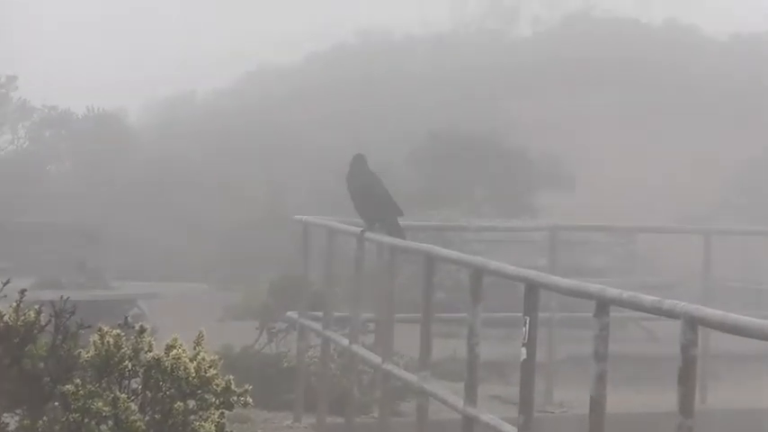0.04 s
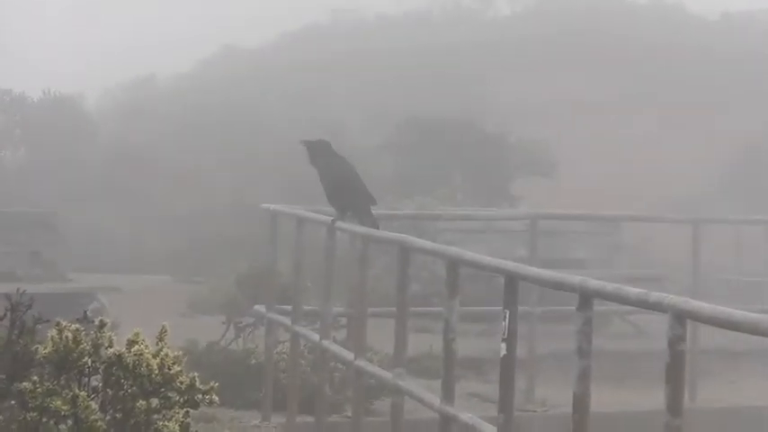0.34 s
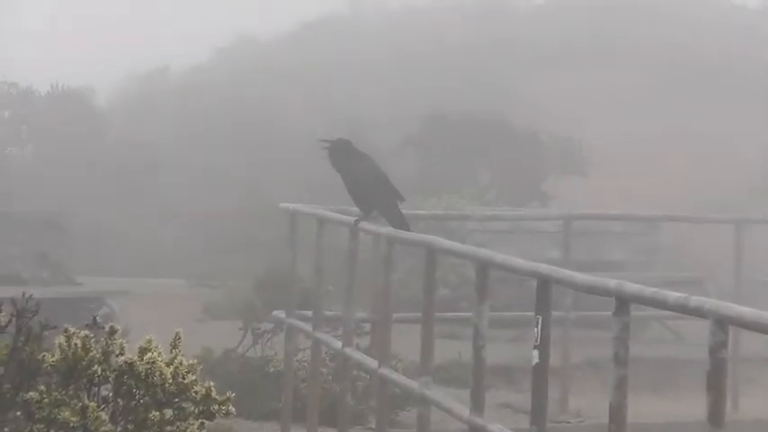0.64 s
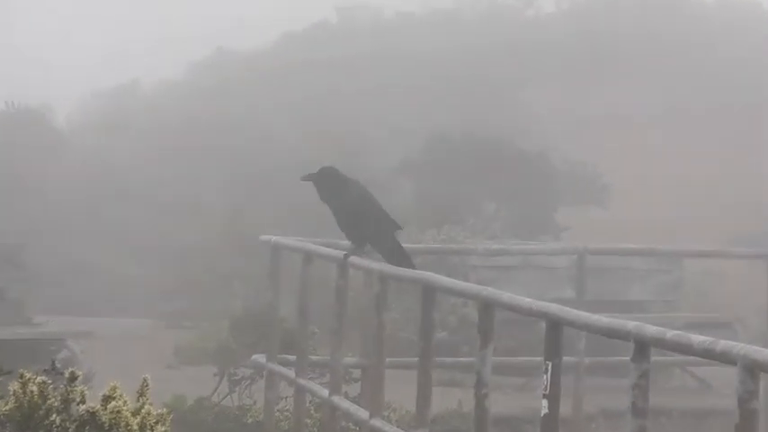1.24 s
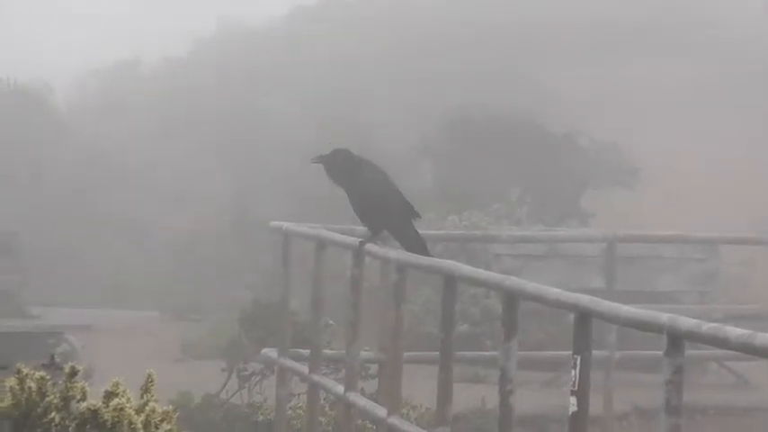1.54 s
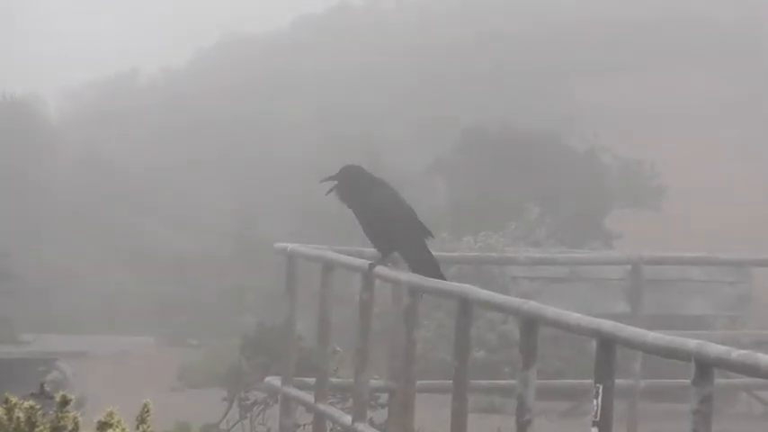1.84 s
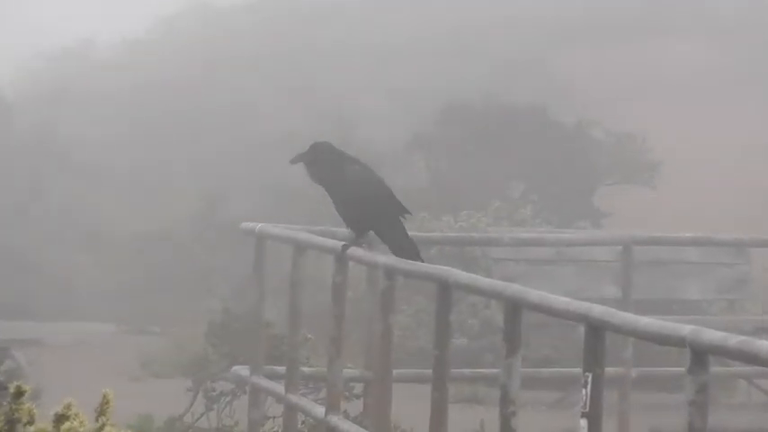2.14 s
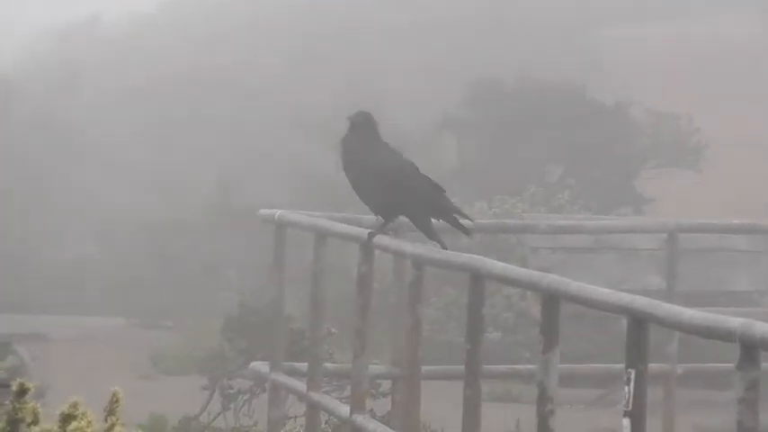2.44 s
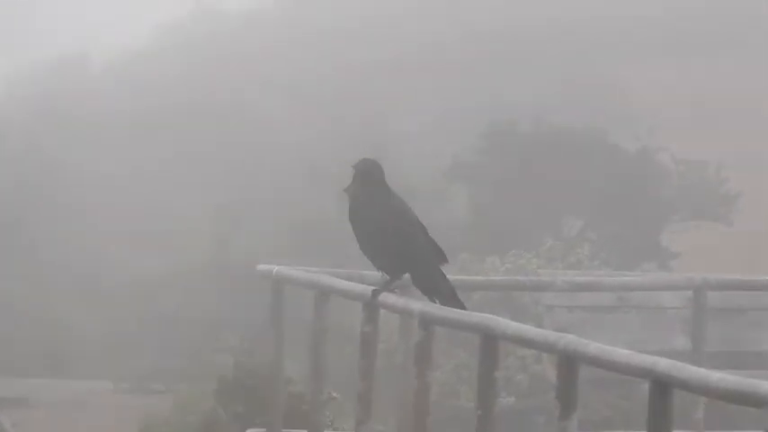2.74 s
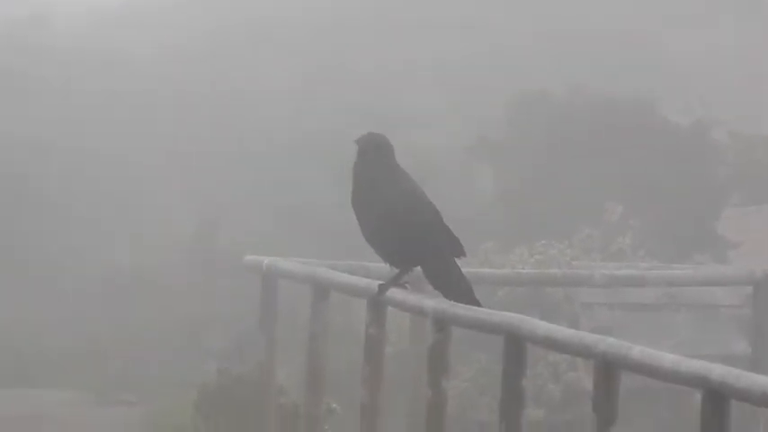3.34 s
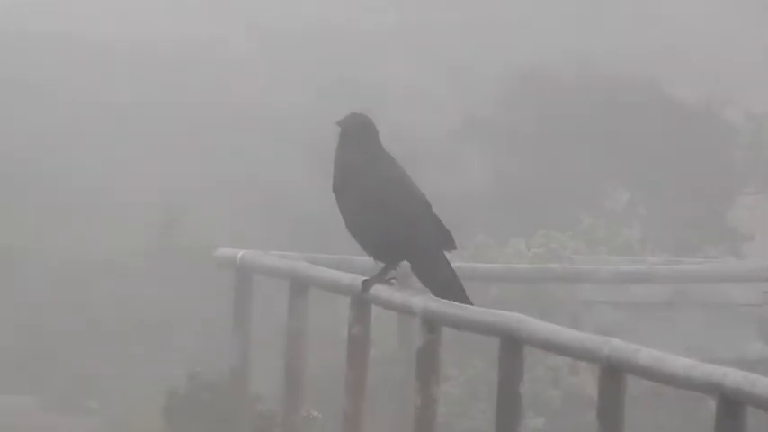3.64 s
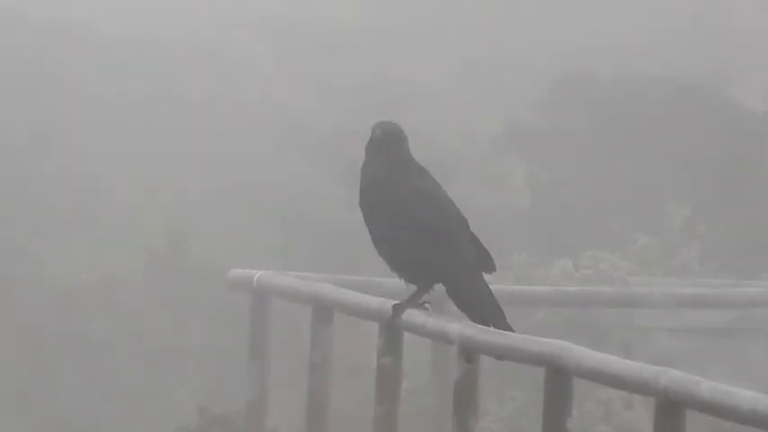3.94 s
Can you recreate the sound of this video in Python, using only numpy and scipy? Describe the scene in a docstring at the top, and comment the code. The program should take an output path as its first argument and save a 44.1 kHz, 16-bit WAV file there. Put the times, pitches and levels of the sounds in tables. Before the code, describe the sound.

Two rattling raven caws ring out in the open air and echo softly. Faint high chirps come and go, while a low gust bumps the microphone between the caws and stronger gusts rumble after them.

```python
"""Outdoors in fog, a raven on a railing croaks twice and the land throws back a faint echo.
Each croak is a rattle of strong and weak bursts from the bird's buzzing voice box, shaped by its throat.
A small bird chirps now and then, and gusts of wind buffet the microphone.
Behind it all lie a low, distant wash of noise and a few faint moans."""
import sys
import numpy as np
from scipy import signal
from scipy.fft import rfft, irfft
from scipy.io import wavfile
from scipy.ndimage import uniform_filter1d

SR = 44100
rng = np.random.default_rng(int(sys.argv[2]) if len(sys.argv) > 2 else 0)


def bounce(signal):
    """Save signal as a 16-bit WAV file at the path given by the first command-line argument."""
    frames = np.transpose(np.atleast_2d(signal))
    limited = np.clip(frames, -1, 1)
    pcm = np.round(limited * 32767).astype(np.int16)
    wavfile.write(sys.argv[1], SR, pcm)


N = 176400
T = np.arange(N) / SR
# how long the land rings after a sound (frequency [Hz], time to fade by 60 dB [s])
LAND_RING = [(310, .61), (1210, 0.65), (3510, 0.53), (9010, .34)]


def amp(db):
    """Turns decibels into a gain."""
    return 10 ** (np.asarray(db) / 20)


def unit(x):
    """Scales a signal to an average strength (rms) of 1."""
    return x / np.sqrt(np.mean(x ** 2) + 1e-20)


def read(points, hz):
    """Looks up a table between its rows, on a log-frequency axis."""
    f, value = np.transpose(points)
    return np.interp(np.log(hz + 1), np.log(f + 1), value)


def follow(rows, t):
    """Looks up each column of a curve at times t."""
    s, *columns = np.transpose(rows)
    return [np.interp(t, s, c) for c in columns]


def add(mix, s, sound):
    """Mixes a sound in, starting at s seconds."""
    at = round(s * SR)
    sound = sound[..., max(-at, 0):]
    part = mix[..., max(at, 0):][..., :sound.shape[-1]]
    part += sound[..., :part.shape[-1]]


def drift(count, hz):
    """A random wobble, mostly slower than hz."""
    keep_slow = np.exp(-(np.arange(SR // 2 + 1) / hz) ** 2)
    return unit(irfft(rfft(rng.standard_normal(SR)) * keep_slow))[:count]


def colour(x, points):
    """Makes each frequency louder or softer as a table says, with no ringing ahead of the sound."""
    log_gain = np.log(amp(read(points, abs(np.fft.fftfreq(4096, 1 / SR)))))
    taps = np.fft.ifft(np.exp(np.conj(signal.hilbert(log_gain)))).real
    return signal.oaconvolve(x, taps[:len(taps) // 2])[:N]


def noise(points, likeness, patchy_db, swell_db):
    """Stereo noise with drifting loud and soft patches and a slow swell shared by both sides."""
    hz = np.fft.rfftfreq(2048, 1 / SR)
    a, b, c, d, patches = rng.standard_normal((5, N // 512 + 5, len(hz)))
    patches = unit(uniform_filter1d(uniform_filter1d(patches, size=9, axis=0), size=7, axis=1))
    swell = unit(uniform_filter1d(rng.standard_normal(len(a)), size=25))[:, None]
    swell = swell / (1 + hz / 810)  # the treble hiss hardly swells
    same = np.clip(read(likeness, hz), -1, 1)
    left = a + 1j * b
    right = same * left + np.sqrt(1 - same ** 2) * (c + 1j * d)
    spectra = np.array([left, right]) * amp(read(points, hz) + patchy_db * patches + swell_db * swell)
    return unit(signal.istft(spectra.transpose(0, 2, 1), nperseg=2048, noverlap=1536)[1][:, :N])


def reverb(x, ring_times):
    """Many reflections blur into a stereo tail, each frequency fading at its own speed."""
    hiss = rng.standard_normal((2, 2 * SR)) + rng.standard_normal(2 * SR)
    hz, t, spectra = signal.stft(hiss, SR, nperseg=256)
    tail = signal.istft(spectra * amp(-60 * t / read(ring_times, hz)[:, None]), SR, nperseg=256)[1]
    mids = abs(rfft(tail[0], SR))[1000:1700]
    return signal.fftconvolve(x[None], tail / np.sqrt(np.mean(mids ** 2)), axes=1)[:, :N]


def distant_wash():
    """A low, steady rush from far away that swells a little."""
    # tone of the wash (frequency [Hz], level [dB])
    tone = [(22, -41), (60, 0), (100, 0), (310, -1.5), (450, -7.5), (600, -11.5), (810, -9.5), (1050, -15),
            (1350, -23), (1600, -21), (2050, -21), (2500, -27.5), (3300, -31.5), (4400, -37), (5500, -32.5),
            (9000, -35), (15600, -35)]
    # how alike left and right are (frequency [Hz], likeness [-1 to 1])
    likeness = [(62, 0.36), (135, 0.75), (295, 0.66), (650, .5), (1400, 0.42), (3150, 0.89), (6800, 0.98),
                (14900, 0.31)]
    return amp(-48) * noise(tone, likeness, patchy_db=1.8, swell_db=2.5)


def whistle(curve, pitch_factor):
    """A bird's gliding note, roughened by a second, slower vibration."""
    shake_hz, swing = 654, 1.4
    t = np.arange(curve[0][0], curve[-1][0], 1 / SR)
    hz, db, buzz = follow(curve, t)
    shake = 2 * np.pi * np.cumsum(shake_hz * (1 + .08 * drift(len(t), 200))) / SR
    phase = 2 * np.pi * np.cumsum(hz * pitch_factor * (1 + 0.014 * drift(len(t), 300))) / SR
    return amp(db) * (1 + .4 * buzz * np.cos(shake)) * np.sin(phase + swing * buzz * np.sin(shake))


def small_bird():
    """Repeated chirps and one thin whistle ring out over the land."""
    # the chirps (time of the peak [s], level [dB], pitch factor [ratio])
    chirps = [(-.001, -45, 0.96), (.0585, -60, 1), (0.649, -47, 1.026), (1.3547, -48, 1.03),
              (1.8957, -49, 1.09), (2.8205, -43.5, 0.99), (3.387, -43.5, 0.98)]
    # a buzzy rise, then a clean flick (time from the peak [s], pitch [Hz], level [dB], buzz [0-1])
    chirp_shape = [(-.037, 3400, -18, .9), (-.026, 4030, -12.5, .8), (-.014, 4870, -7, .9),
                   (-.009, 4290, -8.5, 1), (-.005, 4730, -4.5, .3), (0, 5620, -1, .08),
                   (.005, 6030, -15, .1), (.01, 6100, -14, .1), (.015, 5900, -37, .1)]
    # the thin whistle (time [s], pitch [Hz], level [dB], buzz [0-1])
    thin_note = [(.75, 8800, -77, .3), (.763, 8250, -62, .3), (.785, 8100, -60.5, 0.2),
                 (.82, 8600, -64.5, .3), (.842, 9300, -74, .3)]
    out = np.zeros(N)
    for s, db, pitch_factor in chirps:
        add(out, s + chirp_shape[0][0], amp(db) * whistle(chirp_shape, pitch_factor))
    add(out, thin_note[0][0], whistle(thin_note, 1))
    return out + amp(-12) * reverb(out, LAND_RING)


def wind():
    """Gusts rumble and flutter on the microphone, and single swirls of air thump it."""
    # strength of the gusts (time [s], level [dB])
    gusts = [(0, -71), (.21, -54), (.26, -42.5), (.31, -67), (1.3, -56.5), (1.41, -39.5), (1.44, -26.5),
             (1.5, -36.5), (1.58, -49), (1.7, -71), (2.92, -59), (3.09, -32.5), (3.16, -39.5), (3.185, -28),
             (3.25, -30.5), (3.28, -17.5), (3.315, -26), (3.36, -27), (3.4, -39.5), (3.43, -30),
             (3.57, -33), (3.595, -50), (3.625, -32), (3.71, -32.5), (3.8, -51.5), (3.915, -41),
             (3.96, -52.5), (4, -40.5)]
    # tone of the rumble and of the flutter (frequency [Hz], level [dB])
    rumble_tone = [(20, -33), (50, -8), (95, 1), (160, -2.5), (250, -9), (350, -19.5), (500, -36.5),
                   (900, -44), (2000, -75.5)]
    flutter_tone = [(105, -36), (285, 2), (510, -6), (910, -21), (1410, -32), (2510, -50), (6100, -69)]
    # how alike left and right are (frequency [Hz], likeness [-1 to 1])
    likeness = [(62, 0.75), (135, 0.79), (290, 0.07), (640, -0.75)]
    # the swirls (time [s], level [dB], pitch [Hz])
    swirls = [(0.274, -25.5, 91), (1.429, -19, 100), (1.447, -14.5, 109.4), (3.277, -7, 148.4),
              (3.289, -8.5, 153.5), (3.332, -17.5, 188), (3.365, -16.5, 109.5), (3.43, -16, 122),
              (3.628, -16, 109), (3.708, -18.5, 156), (3.911, -27, 173)]
    gust_db, = follow(gusts, T)
    flutter_db = 2 + 1.455 * gust_db  # flutter grows faster than rumble
    out = amp(gust_db) * noise(rumble_tone, likeness, patchy_db=-1.15, swell_db=-0.55)
    out += amp(flutter_db) * noise(flutter_tone, likeness, patchy_db=4.2, swell_db=3.64)
    t = np.arange(-SR // 40, SR // 40) / SR
    for s, db, hz in swirls:
        phase = 0.81 * rng.standard_normal((2, 1))  # each side is hit a little differently
        thump = np.cos(2 * np.pi * hz * t + phase) / np.cosh(hz * t / 0.33)
        add(out, s + t[0], amp(db) * thump)
    return out


def burst(hz, buzz_db, buzz_s, rasp_db, rasp_s):
    """The raven's voice box snaps open and buzzes briefly as air rasps through. Rows: buzz, rasp."""
    rise_s, jitter, fade_shape = 0.00048, 0.033, 1.31
    t = np.arange(SR // 40) / SR
    turns = np.cumsum(hz * (1 + jitter * drift(len(t), 210))) / SR
    phase = 2 * np.pi * (turns - .12)
    buzz = sum(np.cos(k * phase) for k in range(1, 18))
    buzz *= amp(buzz_db) * (np.exp(-(t / buzz_s) ** fade_shape) + 0.15 * np.exp(-t / 0.0054))
    rasp = rng.standard_normal(len(t)) * (1 + 0.66 * np.cos(phase))
    rasp *= amp(rasp_db) * np.exp(-(t / rasp_s) ** fade_shape)
    return (1 - np.exp(-t / rise_s)) * np.array([buzz, rasp])


def throat(source):
    """The throat and beak boost some frequencies of the buzz and rasp and soften others."""
    # how the throat shapes each of them (frequency [Hz], level [dB])
    buzz_tone = [(150, -47.5), (400, -10), (560, -14.5), (850, -18), (1050, -8.5), (1220, 1), (1400, 1),
                 (1650, -4), (2000, -16.5), (2600, -32.5), (3100, -26.5), (3600, -19), (4500, -31.5),
                 (5700, -39), (6400, -30.5), (7500, -49), (15000, -52)]
    rasp_tone = [(200, -16), (550, 4), (900, -16.5), (1300, 4.5), (1650, 14), (2200, 3), (2600, -11),
                 (3050, -6.5), (3450, 4.5), (4200, -1.5), (4700, -2.5), (5300, -8), (5700, -24.5),
                 (6400, -5.5), (7300, -21), (8200, -18.5), (10000, -21.5), (11300, -19), (12500, -32),
                 (15500, -33)]
    return amp(-15) * colour(source[0], buzz_tone) + amp(-26) * colour(source[1], rasp_tone)


def croak(curve):
    """Every cycle of the rattle fires a strong burst and then a weak one."""
    # the two bursts (place in the cycle [0-1], buzz [dB], buzz fade [s], rasp [dB], rasp fade [s])
    pulses = [(0, 0, 0.0046, -1, 0.0095), (.57, -8.5, 0.0041, 0, 0.005)]
    t = np.arange(curve[0][0], curve[-1][0], 1 / SR)
    rate, effort, pitch = follow(curve, t)
    cycles = np.cumsum(rate) / SR
    source = np.zeros((2, N))
    for place, buzz_db, buzz_s, rasp_db, rasp_s in pulses:
        for i in np.searchsorted(cycles, np.arange(place, cycles[-1])):
            pulse = burst(pitch[i], buzz_db + effort[i], buzz_s, rasp_db + 1.25 * effort[i], rasp_s)
            add(source, t[i], pulse)
    # the buzz's lowest tone keeps humming between bursts
    hum_hz = pitch * (1 + 0.017 * drift(len(t), 240))
    hum = amp(-8.5 + effort / 2) * np.sin(2 * np.pi * np.cumsum(hum_hz) / SR)
    fade = np.sin(np.linspace(0, np.pi, len(t))).clip(0) ** 0.17
    add(source[0], t[0], hum * fade)
    return throat(source)


def raven():
    """Throat pops lead into two croaks; the land rings with them and sends back a far echo."""
    # pops before a croak (time [s], level [dB], pitch [Hz])
    pops = [(.8292, -27, 590), (0.839, -21, 614), (1.9592, -17, 600)]
    # one curve per croak (time [s], rattle rate [Hz], effort [dB], buzz pitch [Hz])
    croaks = [
        [(.866, 43.54, -13, 463), (.892, 40.86, -16.5, 501), (.9146, 39.48, -5.5, 558.7),
         (.945, 37.06, -1, 587.3), (.98, 42.54, -0.5, 600.2), (1.018, 38.72, -0.5, 600),
         (1.043, 36.7, -4.5, 595.5), (1.063, 36.7, -11, 590)],
        [(2.003, 30.1, -18, 478), (2.033, 37.24, -10, 534.7), (2.062, 51.9, -3, 588), (2.078, 48.18, -1, 590.7),
         (2.105, 40.41, -2.5, 598), (2.15, 42.17, -1.5, 594), (2.172, 41.93, -5.5, 606), (2.191, 41, -1.5, 557)],
    ]
    # tone of the opening gurgle and of the land's reflections (frequency [Hz], level [dB])
    gurgle_tone = [(300, -31), (700, -10), (860, -2), (1050, -3.5), (1400, -6), (2200, -35), (8000, -60)]
    land_tone = [(500, -2), (1020, 0), (1200, 3.5), (1420, 1), (3500, 3), (9000, -14)]
    # each croak's gurgle and far echo (level [dB])
    gurgle_levels = [-38.5, -46.5]
    echo_levels = [-31.5, -23.5]
    # how long the far echo rings (frequency [Hz], time to fade by 60 dB [s])
    echo_ring = [(320, .52), (1120, 1.2), (1620, 3.8), (2320, 0.76), (4020, 0.24)]
    # tone of the far echo (frequency [Hz], level [dB])
    echo_tone = [(500, -6), (1200, -4), (1600, 6), (3500, -6), (8000, -25)]
    gurgle_rise_s, echo_delay_s, pan_db = .011, .13, 0.8
    source, echoes = np.zeros((2, N)), np.zeros((2, N))
    for s, db, hz in pops:
        add(source, s, burst(hz, buzz_db=db, buzz_s=0.0034, rasp_db=db - 18, rasp_s=0.0044))
    voice = throat(source)
    for curve, echo_db, gurgle_db in zip(croaks, echo_levels, gurgle_levels):
        call = croak(curve)
        age = np.maximum(T - curve[0][0] + 0.0078, 0) / gurgle_rise_s
        gurgle = unit(colour(rng.standard_normal(N), gurgle_tone))
        call += amp(gurgle_db) * age * np.exp(1 - age) * gurgle
        voice += call
        add(echoes, echo_delay_s, amp(echo_db) * reverb(colour(call, echo_tone), echo_ring))
    reflections = amp(-19) * reverb(colour(voice, land_tone), LAND_RING)
    return voice * amp([[pan_db], [-pan_db]]) + reflections + echoes


def moans():
    """Faint, fuzzy tones glide far away."""
    # the tones (start [s], length [s], first pitch [Hz], last pitch [Hz], level [dB])
    glides = [(1.68, 0.32, 630, 790, -55.5), (3.48, 0.17, 720, 610, -60), (3.66, 0.337, 838, 810, -59.5)]
    out = np.zeros(N)
    for s, length, first_hz, last_hz, db in glides:
        progress = np.arange(0, 1, 1 / (length * SR))
        hz = first_hz + (last_hz - first_hz) * progress + 26 * drift(len(progress), 90)
        add(out, s, amp(db) * np.sin(np.pi * progress) * np.sin(2 * np.pi * np.cumsum(hz) / SR))
    return out


def scene():
    """All the sounds together, in stereo."""
    return distant_wash() + wind() + moans() + small_bird() + raven()


def record(dry):
    """The microphone weakens three narrow bands and cuts the highest treble."""
    # dips in the microphone's tone (frequency [Hz], width [Hz], depth [0-1])
    dips = [(1797, 304, 1), (2387, 164, 0.93), (3050, 150, 0.8)]
    for hz, width_hz, depth in dips:
        dry = dry - depth * signal.lfilter(*signal.iirpeak(hz, hz / width_hz, SR), dry)
    treble_cut = signal.firwin(511, cutoff=15800, window=("kaiser", 9), fs=SR)
    return signal.oaconvolve(dry, treble_cut[None], "same")


dry = scene()
out = record(dry)
bounce(out)
```